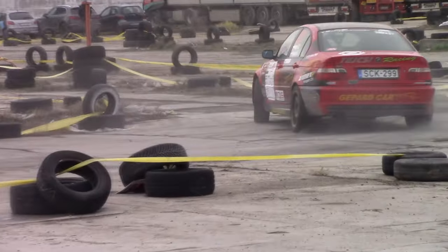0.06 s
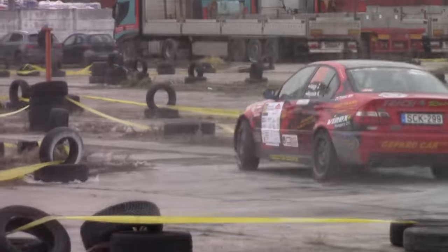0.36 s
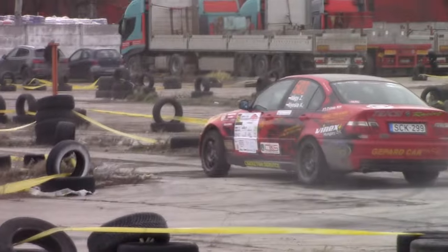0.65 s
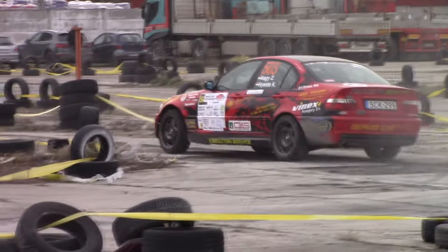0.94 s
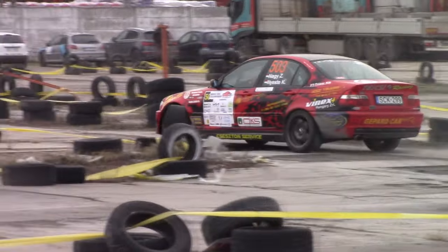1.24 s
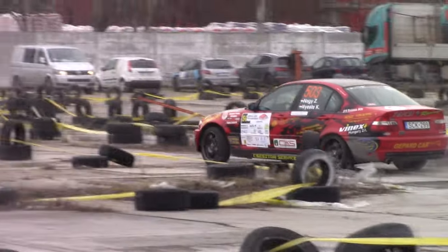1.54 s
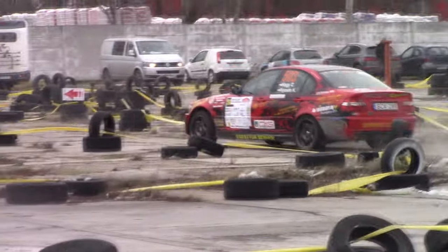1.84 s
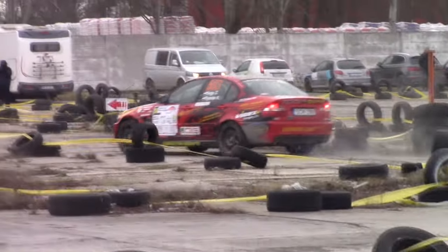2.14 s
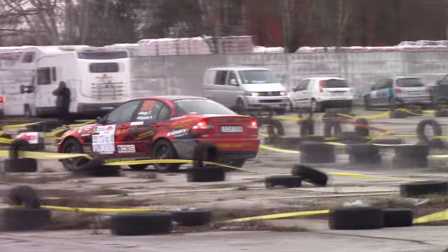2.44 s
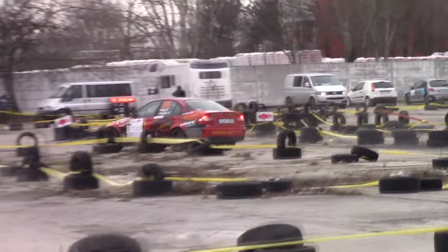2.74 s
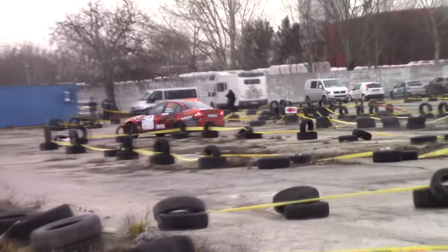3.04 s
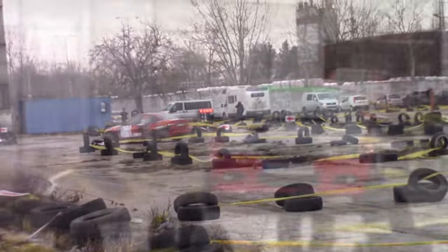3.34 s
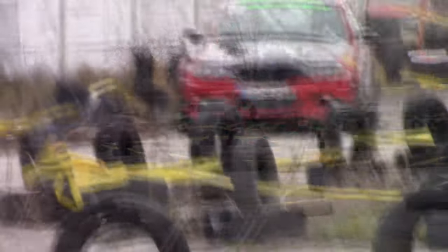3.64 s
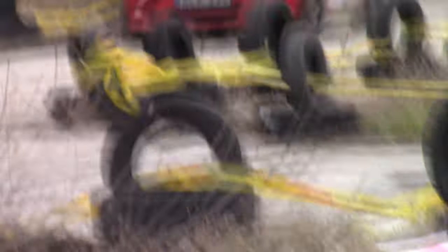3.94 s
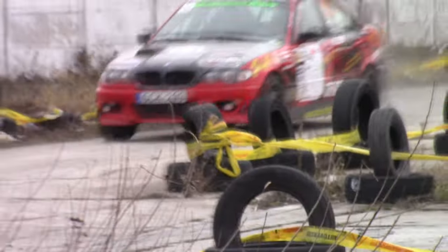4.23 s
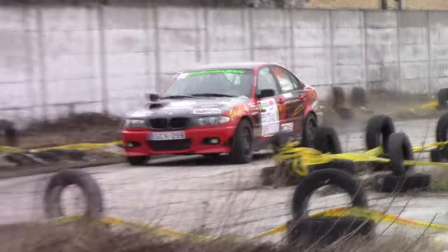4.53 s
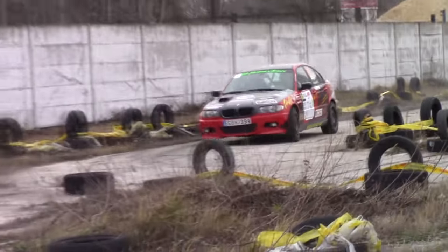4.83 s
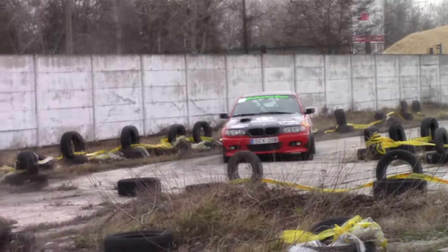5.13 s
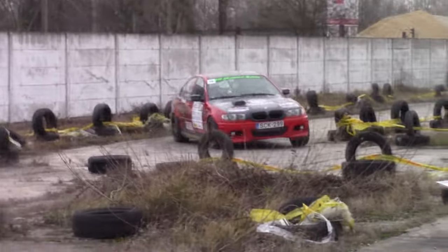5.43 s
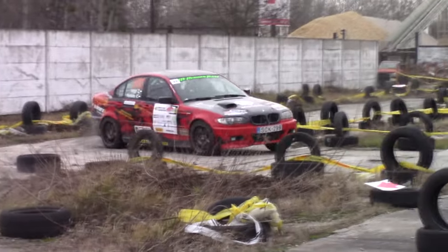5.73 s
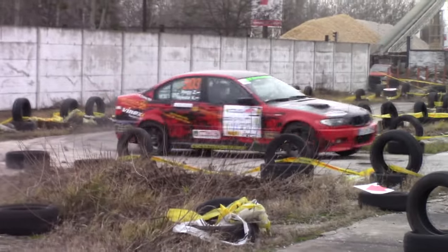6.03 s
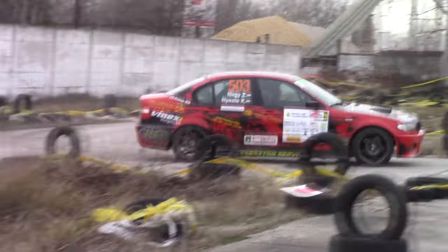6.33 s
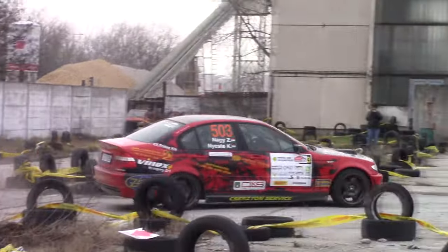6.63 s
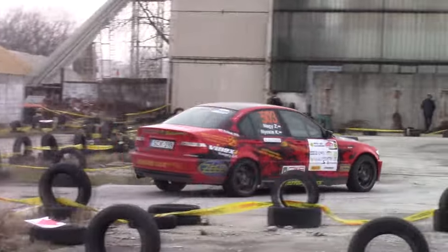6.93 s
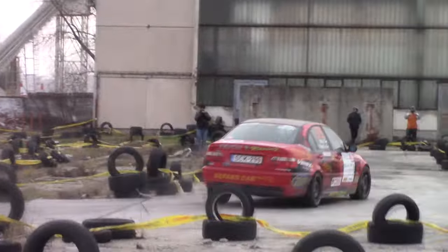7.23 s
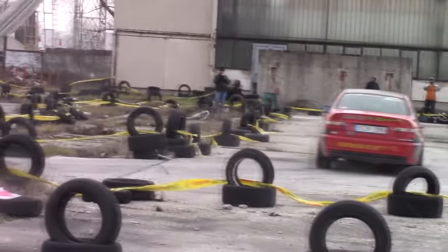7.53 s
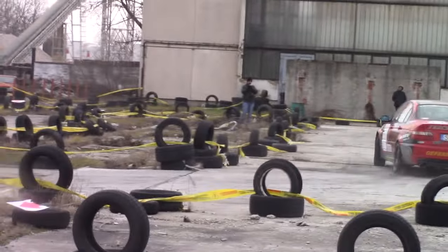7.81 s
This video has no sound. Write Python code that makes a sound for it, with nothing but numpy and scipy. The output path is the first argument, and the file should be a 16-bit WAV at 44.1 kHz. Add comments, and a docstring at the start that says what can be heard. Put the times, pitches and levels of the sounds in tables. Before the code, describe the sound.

Tyres squeal and chirp on concrete as a rally car accelerates in short, rising bursts nearby. The driver lifts off and the engine drops to an uneven burble with crackling backfires. Grit hisses and stones rattle under the wheels, followed by another cluster of pops. A long, wavering tyre howl fills the last part, with the engine revving up at the end. The outdoor lot adds only a faint echo.

```python
"""A concrete lot, heard from the edge of the course, where a six-cylinder rally car drifts through turns.
The exhaust fires one blast a cylinder: it rasps and booms on the throttle, and off it burbles and cracks
with unburnt fuel. The sliding tyres stick and slip into howls and chirps, scrape, and throw up grit.
A thin whine winds down between the turns, and walls round the lot return a faint echo."""
import sys
import numpy as np
from scipy import signal
from scipy.fft import rfft, irfft
from scipy.io import wavfile
from scipy.ndimage import uniform_filter1d

SR = 44100
rng = np.random.default_rng(int(sys.argv[2]) if len(sys.argv) > 2 else 0)


def master_out(mix):
    """Clip the mix to full scale and print it as 16-bit PCM to the path in sys.argv[1]."""
    frames = np.transpose(np.atleast_2d(mix))
    ceiling = np.clip(frames, -1, 1)
    pcm = np.round(ceiling * 32767).astype(np.int16)
    wavfile.write(sys.argv[1], SR, pcm)


N = 347067
TIME = np.arange(N) / SR


def undb(db):
    """Decibels to gain."""
    return 10 ** (np.asarray(db) / 20)


def curves(rows):
    """Automation lanes: each column after the time, drawn out to every sample."""
    times, *columns = np.transpose(rows)
    return [np.interp(TIME, times, column) for column in columns]


def gate(start, end, fade_s):
    """Opens between two times, with linear fades."""
    return np.clip(np.minimum(TIME - start, end - TIME) / fade_s + .5, 0, 1)


def swell(start, end, attack_s, release_s):
    """An envelope that rises towards one from the start and dies away after the end."""
    attack = 1 - np.exp(-np.maximum(TIME - start, 0) / attack_s)
    return attack * np.exp(-np.maximum(TIME - end, 0) / release_s)


def walk(rate):
    """A random modulator of spread 1 that glides to a new value `rate` times a second."""
    steps = rng.standard_normal(N // 10)
    wander = np.interp(TIME * rate, np.arange(len(steps)), steps)
    return wander / wander.std()


def colour(x, points, size=2048):
    """Minimum-phase EQ through points of f/Hz, level/dB."""
    hz, db = np.transpose(points)
    gain = undb(np.interp(np.log(np.fft.rfftfreq(size, 1 / SR) + 1), np.log(hz), db))
    cepstrum = irfft(np.log(gain))
    cepstrum[1:size // 2] *= 2
    cepstrum[size // 2 + 1:] = 0
    return signal.fftconvolve(x, irfft(np.exp(rfft(cepstrum))))[:len(x)]


def normalise(x, low_hz, high_hz):
    """Scales a sound to an RMS of one within a band."""
    hz = np.fft.rfftfreq(len(x), 1 / SR)
    band = rfft(x)[(hz > low_hz) & (hz < high_hz)]
    return x * len(x) / np.sqrt(2 * np.sum(abs(band) ** 2))


def walls(x, t60_s=0.3, predelay_s=0.002):
    """Scattered echoes from walls and parked cars, different at each ear."""
    t = np.arange(SR // 2) / SR
    echoes = rng.standard_normal((2, len(t))) ** 3 * undb(-60 * t / t60_s) * (t > predelay_s)
    echoes /= np.sqrt(np.sum(echoes ** 2, axis=1, keepdims=True))
    return signal.fftconvolve(x[None], echoes, axes=1)[:, :N]


def whine(wander=.011, flicker_db=4):
    """A thin, blurred, flickering tone that sinks in pitch, probably the turbo running down."""
    # the falling whine, one list a run: t/s, f/Hz, level/dB
    runs = [
        [(4.15, 14400, -62), (4.5, 10050, -53), (5, 7950, -52), (5.4, 7500, -55), (5.65, 7200, -50),
         (5.92, 6700, -51)],
        [(6.36, 9500, -56), (6.43, 9300, -47), (6.49, 8800, -42), (6.55, 8800, -45), (6.63, 8500, -58)],
    ]
    out = np.zeros(N)
    for run in runs:
        hz, db = curves(run)
        phase = 2 * np.pi * np.cumsum(hz * (1 + wander * walk(700))) / SR
        out += np.sin(phase) * undb(db + flicker_db * walk(35)) * gate(run[0][0], run[-1][0], .04)
    return out


def grit(eq, grain_db, flutter_db, flutter_rate):
    """Grainy noise: countless tiny impacts of unequal size, coming in flurries."""
    grains = undb(grain_db * walk(2500) + flutter_db * walk(flutter_rate))
    return colour(rng.standard_normal(N) * grains, eq)


def gravel(attack_s=0.021, release_s=0.037):
    """Coarse stones rattle under the tyres."""
    # the wheels cut through loose gravel: start/s, end/s, level/dB
    runs = [(1.92, 2.04, -32), (2.14, 2.24, -25.5), (3.522, 3.6, -22.5), (3.72, 4.013, -23.5),
            (4.176, 4.418, -37.5)]
    # colour of the stones: f/Hz, level/dB
    stone_eq = [(500, -38), (2000, -14), (3100, 4.5), (4400, -1), (6000, -10), (15000, -48)]
    stones = grit(stone_eq, grain_db=1.5, flutter_db=2.1, flutter_rate=70)
    level = sum(undb(db) * swell(start, end, attack_s, release_s) for start, end, db in runs)
    return normalise(stones, 3200, 4700) * level


def skid(roar_db=-14, hiss_db=-17, judder_db=0.7, attack_s=0.013, release_s=0.039):
    """Rubber rolls and scrubs over the concrete and flings hissing sprays of grit."""
    # how far off the car is, which sets the roar and hiss of rolling: t/s, distance/m
    distance = [(0, 19.6), (1.1, 16.6), (2.2, 22.5), (2.55, 33), (3.25, 40), (3.6, 14.7), (5.4, 17.7),
                (6.5, 12), (7.87, 13.6)]
    # the tyres scrub sideways: start/s, end/s, level/dB
    scrubs = [(0, 1.006, -30.5), (1.04, 1.17, -34.5), (1.29, 1.499, -27.5), (1.613, 2.11, -31),
              (2.118, 2.269, -27), (3.488, 3.61, -32), (3.692, 4.092, -28.5), (4.1, 4.413, -38),
              (5.072, 5.247, -27), (5.374, 5.919, -35), (5.933, 6.424, -31), (6.662, 6.76, -24.5),
              (6.793, 7.34, -30), (7.553, 7.87, -29)]
    # grit flung by the wheels: crest/s, rise/s, fade/s, level/dB
    sprays = [(.99, 0.026, 0.024, -32.5), (1.75, .06, 0.05, -34.5), (2.001, 0.12, 0.057, -25),
              (2.24, 0.049, 0.023, -33), (3.65, 0.066, 0.071, -17), (3.97, 0.17, 0.099, -23),
              (4.32, 0.15, 0.089, -30), (5.19, 0.052, 0.076, -33.5), (6.8, 0.058, .12, -37),
              (7.04, 0.07, 0.054, -31)]
    # colour of scrubbing rubber: f/Hz, level/dB
    scrape_eq = [(40, -52), (200, -47), (450, -21), (800, -7.5), (1300, 6), (2000, 5.5), (2700, 6.5),
                 (3600, 1), (4800, -10), (7000, -16), (15000, -75)]
    # colour of flying grit: f/Hz, level/dB
    spray_eq = [(500, -43.5), (2500, 1.5), (4800, -1.5), (6500, 4), (8500, -0.5), (10000, -7), (12000, -19),
                (15500, -30)]
    metres, = curves(distance)
    scrubbing = sum(undb(db) * swell(start, end, attack_s, release_s) for start, end, db in scrubs)
    scrape_level = np.hypot(undb(roar_db) / metres, scrubbing) * undb(-1.5 + judder_db * walk(20))
    flung_power = 0
    for crest, rise_s, fade_s, db in sprays:
        burst = np.exp(-np.maximum((crest - TIME) / rise_s, (TIME - crest) / fade_s))
        flung_power += (undb(db) * burst) ** 2
    spray_level = np.hypot(undb(hiss_db) / metres, np.sqrt(flung_power))
    scrape = grit(scrape_eq, grain_db=2.0, flutter_db=1.5, flutter_rate=90)
    spray = grit(spray_eq, grain_db=1.5, flutter_db=1.47, flutter_rate=58)
    return normalise(scrape, 3042, 3890) * scrape_level + normalise(spray, 6030, 12000) * spray_level


def chirps(wander=0.026, chatter_db=2.0, rasp=.3, third_db=-13, fade_s=.006):
    """For a moment the whole contact patch slips in step: a clear squeal with a rasping edge."""
    # squeals of the tread: t/s, length/s, first f/Hz, last f/Hz, level/dB, overtones/dB
    squeals = [(0.087, 0.044, 1990, 1790, -30, -25), (0.136, 0.032, 2420, 2186, -19.5, -36),
               (.175, 0.054, 2100, 2204, -24.5, -31), (0.228, 0.021, 1143, 966, -23, 0),
               (0.285, 0.012, 1340, 1300, -18, -24), (0.368, 0.022, 1350, 1284, -20, -21),
               (0.409, 0.0095, 1330, 1260, -18, -9), (0.459, 0.01, 1327, 1190, -19, -18),
               (0.48, 0.022, 1306, 1373, -25, -14), (.497, 0.018, 1362, 1120, -17, -23),
               (0.518, 0.048, 1088, 928, -29.5, -12), (0.951, 0.023, 1230, 1335, -18.5, -2.5),
               (0.975, 0.039, 1411, 1350, -20.5, -12), (1.08, 0.017, 1364, 1340, -21, -9),
               (1.37, 0.028, 1311, 1238, -21.5, -10), (5.104, 0.029, 1387, 1290, -22, -24),
               (5.145, 0.0317, 1333, 1200, -20.5, 1), (5.179, 0.027, 1228, 1216, -21, 7.5),
               (5.204, 0.053, 1226, 1240, -26.5, 10.5), (5.257, 0.023, 1240, 1230, -41, 20),
               (5.294, 0.017, 1230, 1223, -42, 19.5), (5.321, 0.12, 1335, 1302, -34.5, 4.5),
               (5.988, 0.042, 1900, 1858, -24, -24), (6.456, 0.041, 2652, 2548, -26, -27),
               (6.839, 0.042, 1850, 1890, -30, -24), (7.04, 0.044, 2390, 2480, -21, -20),
               (7.744, 0.0291, 2165, 2276, -22.5, -22)]
    out = np.zeros(N)
    waver = 1 + wander * walk(600)
    chatter = undb(chatter_db * walk(220)) * (1 + rasp * walk(800))
    for start, length, first_hz, last_hz, db, overtone_db in squeals:
        envelope = gate(start, start + length, fade_s)
        on = envelope > 0
        glide_hz = np.interp(TIME[on], [start, start + length], [first_hz, last_hz])
        phase = 2 * np.pi * np.cumsum(glide_hz * waver[on]) / SR
        overtones = np.sin(2 * phase) + undb(third_db) * np.sin(3 * phase)
        out[on] += undb(db) * envelope[on] * (np.sin(phase) + undb(overtone_db) * overtones)
    return out * chatter


def howl(hz, level, spread_hz, chatter_db, catch_db, wander=.033, low_cut_hz=650):
    """Tread blocks stick and slip out of step near one wavering pitch; the patch chatters and catches."""
    phase = 2 * np.pi * np.cumsum(hz * (1 + wander * walk(60))) / SR
    # slow noise in amplitude and phase smears the tone into a narrow band
    lowpass = signal.butter(2, spread_hz / 2, fs=SR, output="sos")
    blocks = signal.sosfilt(lowpass, rng.standard_normal((2, N)))
    blocks = (blocks[0] + 1j * blocks[1]) / blocks.std() / np.sqrt(2)
    grip = undb(chatter_db * walk(110) + catch_db * walk(22))
    tone = level * grip * np.real(blocks * np.exp(1j * phase))
    return signal.sosfilt(signal.butter(2, low_cut_hz, "high", fs=SR, output="sos"), tone)


def slides(high_ratio=1.85, fade_s=0.012):
    """In each slide the tread howls in two voices whose pitches bend together."""
    # tyre slides: start/s, end/s, first f/Hz, middle f/Hz, last f/Hz, low voice/dB, high voice/dB
    drifts = [(0, .2, 1102, 1088, 1190, -18, -13.5), (.25, .54, 1200, 1284, 1190, -21.5, -23.5),
              (.54, .93, 1080, 1159, 1210, -26, -36), (.93, 1.01, 1250, 1350, 1381, -21, -23),
              (1.64, 1.84, 1133, 1200, 1260, -18.5, -33), (3.36, 3.48, 1301, 1290, 1270, -26.5, -28.5),
              (3.49, 3.64, 1270, 1274, 1290, -25, -19.5), (5.08, 5.49, 1245, 1363, 1250, -28, -30),
              (5.49, 5.92, 1057, 995.6, 1040, -24.5, -22.5), (5.92, 6.28, 1009, 1032, 1150, -22, -19),
              (6.28, 6.66, 1090, 1130, 1070, -24, -30), (6.66, 6.97, 1071, 1029, 1040, -23, -19),
              (6.97, 7.31, 1134, 1249, 1110, -20.5, -19.5), (7.31, 7.54, 1024, 957.5, 1000, -21, -20),
              (7.54, 7.87, 1119, 1140, 1190, -17, -20.5)]
    hz, low_level, high_level = np.full(N, float(drifts[0][2])), 0, 0
    for start, end, first_hz, middle_hz, last_hz, low_db, high_db in drifts:
        progress = np.clip((TIME - start) / (end - start), 0, 1)
        arch = np.polyfit([0, .5, 1], [first_hz, middle_hz, last_hz], 2)
        hz = np.where(TIME >= start, np.polyval(arch, progress), hz)
        slip = swell(start, end, fade_s, fade_s)
        low_level += undb(low_db) * slip
        high_level += undb(high_db) * slip
    low = howl(hz, low_level, spread_hz=238, chatter_db=0.5, catch_db=2.45)
    high = howl(high_ratio * hz, high_level, spread_hz=360, chatter_db=2, catch_db=1.5)
    return undb(0.5) * low + undb(-1) * high


def cracks(ring_s=0.0014, ring_share=0.2, puff_s=0.015, puff_db=-24, snap_gain_db=19):
    """Unburnt fuel bangs in the exhaust: a sharp front with a very short ring and a puff of gas."""
    # backfires: t/s, bang peak/dB, ring f/Hz, snap before its gain/dB
    backfires = [(1.285, -0.5, 1805, -31.5), (2.505, -10, 1250, -51), (2.555, -12, 1400, -46),
                 (2.562, -9, 1500, -43), (2.564, -9, 1670, -45), (2.622, -20, 1500, -50),
                 (2.633, -15, 1270, -47), (2.651, -12, 1370, -41), (2.712, -19, 2130, -44),
                 (2.724, -13, 1017, -42), (2.743, -6, 695, -35), (2.818, -15, 1050, -47),
                 (2.836, -15, 1320, -47), (2.913, -15.5, 1120, -42), (2.953, -13, 1086, -39),
                 (3.022, -9, 1698, -36), (3.036, -12, 1310, -47), (3.058, -7, 1450, -50),
                 (3.065, -11, 1320, -45), (3.079, -8.5, 1400, -42), (3.106, -6, 1950, -44),
                 (3.121, -9.5, 1490, -45), (3.127, -9.5, 1380, -45), (3.142, -4, 1370, -28.5),
                 (4.501, -8.5, 2380, -41), (4.516, -3.5, 990, -46), (4.535, -5.5, 1030, -33),
                 (4.57, -5, 1090, -46), (4.575, -6, 1570, -39), (4.582, -7, 1120, -46),
                 (4.588, -5.5, 1470, -49), (4.629, -12, 947, -43), (4.766, -11, 1865, -35),
                 (4.854, -18, 1221, -43), (4.919, -9, 1780, -48)]
    # colour of the body of a bang: f/Hz, level/dB
    bang_eq = [(40, -38), (200, -24), (400, -19.5), (650, 0.5), (1300, 1.5), (2500, 3.5), (4000, -2.5),
               (6000, -18), (15000, -72)]
    # colour of its sharp front: f/Hz, level/dB
    snap_eq = [(1000, -31), (3500, 4.5), (6500, 15), (9000, -3.5), (15000, -44)]
    out, t = np.zeros(N), np.arange(SR // 20) / SR
    for start, db, hz, snap_db in backfires:
        puff = undb(puff_db) * rng.standard_normal(len(t)) * np.exp(-t / puff_s)
        front = 2 * (t == 0) + puff
        ring = ring_share * np.exp(-t / ring_s) * np.cos(2 * np.pi * hz * t)
        bang, snap = colour(front + ring, bang_eq), colour(front, snap_eq)
        at = int(start * SR)
        out[at:at + len(t)] += undb(db) * bang / abs(bang).max()
        out[at:at + len(t)] += undb(snap_db + snap_gain_db) * snap / abs(snap).max()
    return out


def driving(idle_hz=159.96, coast_s=1.8, coast_uneven=0.907, open_s=0.0042, shut_s=0.015):
    """Firing rate, unevenness and level of the engine as the throttle opens and shuts."""
    # pulls on the throttle: start/s, end/s, first firing rate/Hz, last firing rate/Hz,
    # easing/0-1, level/dB, unevenness/0-1
    pulls = [(0, .47, 162, 187, .3, -37.5, .35), (.6, .99, 133, 203, .35, -34.5, .15),
             (1.055, 1.215, 178, 208, 0, -32, .12), (1.28, 1.55, 181, 252, 0, -33.5, .17),
             (1.55, 2.02, 252, 346, .42, -32.5, .27), (6.64, 7.34, 171, 155, 0, -32, .7),
             (7.34, 7.87, 154, 223, 0, -35.5, .12)]
    # louder coughs in the burble: t/s, length/s, level/dB
    coughs = [(2.55, .025, -43), (2.62, 0.051, -40), (2.735, 0.02, -35), (2.81, 0.056, -39.5),
              (2.94, 0.12, -41.5), (3.115, 0.045, -41), (3.53, 0.033, -46), (3.71, 0.16, -35),
              (4.249, 0.065, -38.5), (4.51, 0.076, -32.5), (4.63, 0.03, -39), (4.82, 0.071, -38),
              (5.119, 0.033, -33), (5.47, 0.021, -36), (5.59, 0.091, -36), (5.77, 0.039, -51),
              (5.93, 0.046, -35.5), (6.11, .06, -31), (6.2, .19, -41), (6.45, 0.054, -33),
              (6.65, 0.11, -31)]
    hz, uneven = np.full(N, idle_hz), np.full(N, coast_uneven)
    power = undb(-45.5 + 1.5 * walk(16)) ** 2  # the wavering bed of burble
    for start, end, first_hz, last_hz, ease, db, pull_uneven in pulls:
        progress = np.clip((TIME - start) / (end - start), 0, 1)
        pull_hz = first_hz + (last_hz - first_hz) * (progress + ease * progress * (1 - progress))
        # off the throttle the revs settle towards a fast idle
        coast = np.exp(-np.maximum(TIME - end, 0) / coast_s)
        hz = np.where(TIME >= start, idle_hz + (pull_hz - idle_hz) * coast, hz)
        throttle = swell(start, end, open_s, shut_s)
        uneven += throttle * (pull_uneven - uneven)
        power += (undb(db) * throttle) ** 2
    for start, length, db in coughs:
        power += (undb(db) * swell(start, start + length, open_s, shut_s)) ** 2
    return hz, np.clip(uneven, 0, 1), np.sqrt(power)


def boom(hz, uneven, waver_db=3, odd_db=5, even_db=-4):
    """Under load the two banks alternate: multiples of half the firing rate sweep the pipe's resonance."""
    # resonance of the pipe under load: f/Hz, level/dB
    resonance = [(150, -36), (330, -36), (460, -18), (580, -14), (690, -1), (780, -6), (1000, -18)]
    pipe_hz, pipe_db = np.transpose(resonance)
    phase = np.pi * np.cumsum(hz) / SR
    note = 0
    for k in range(2, 9):
        db = np.interp(k * hz / 2, pipe_hz, pipe_db) + (odd_db if k % 2 else even_db)
        note += undb(db + waver_db * walk(45)) * np.sin(k * phase + k * k)
    return note * (1 - uneven) ** 2


def exhaust(hz, uneven, scatter_db=2, misfire_db=1.5, jitter_s=.00016, stumble_s=0.001197):
    """One blast a firing; off the throttle they come unevenly and the note breaks into a burble."""
    # strength of each cylinder in firing order: level/dB
    cylinders_db = [3, -8, -1, -2, 0, -9]
    # colour of a blast from the tailpipe: f/Hz, level/dB
    pipe_eq = [(40, -56), (120, -67), (180, -32.5), (300, -29), (450, -13), (680, 2.5), (900, 3.5),
               (1250, 7), (1700, 2.5), (2500, -1), (3600, -15), (5000, -38), (8000, -34), (15000, -69)]
    header_s, gas_db, gas_cycles, thud_hz, thud_db = .0006, -13, .5, 320, 2
    cycles = np.cumsum(hz) / SR
    firings = np.flatnonzero(np.diff(np.floor(cycles)))
    size_luck, time_luck = rng.standard_normal((N // 100, 2))[:len(firings)].T
    # the cylinders' own pattern stands out under load
    pattern_db = np.resize(cylinders_db, len(firings)) * (1 - uneven[firings] ** 2)
    size = undb(pattern_db + (scatter_db + misfire_db * uneven[firings]) * np.clip(size_luck, -2, 2))
    size /= np.sqrt(uniform_filter1d(size ** 2, size=12) * hz[firings])  # even power at any revs
    # every other blast takes the longer header pipe
    late_s = header_s * (np.arange(len(firings)) % 2)
    late_s += (jitter_s + stumble_s * uneven[firings] ** 2) * time_luck
    blasts = np.bincount(np.clip(firings + SR * late_s, 0, N - 1).astype(int), size, N)
    # turbulent gas follows each blast out of the pipe
    gas = rng.standard_normal(N) * np.exp(-(cycles % 1) / gas_cycles)
    flow = blasts / blasts.std() + undb(gas_db) * (1 + 2 * uneven) * gas / gas.std()
    # late burning thuds in the silencer
    thud = undb(thud_db) * uneven * signal.lfilter(*signal.iirpeak(thud_hz, 2, fs=SR), flow)
    return normalise(colour(flow + thud, pipe_eq), 400, 783)


def scene():
    """Engine and tyres dead centre, with the faint stereo echo of the lot."""
    hz, uneven, level = driving()
    engine = level * (undb(-1) * exhaust(hz, uneven) + boom(hz, uneven)) + undb(0.5) * cracks() + whine()
    car = engine + slides() + undb(5) * chirps() + skid() + gravel()
    return car + undb(-26) * walls(car)


def record(dry, ceiling=1.12, lopsided=0.0098, top_hz=15700):
    """Two microphone ports on a camera that soft-clips the peaks, a little lopsidedly, and cuts the top."""
    # sound scattered near the microphones, opposite in the two: f/Hz, level/dB
    width_eq = [(100, -15), (500, -25), (1000, -24), (2300, -18), (4500, -10), (8000, -7), (10000, -6),
                (12500, 0)]
    # treble difference between the ports: f/Hz, left minus right/dB
    port_eq = [(2500, 0), (4000, -1), (8000, -3.2), (12000, 2)]
    scatter = rng.standard_normal(SR // 10) * np.linspace(1, 0, SR // 10) ** 2
    scatter /= np.linalg.norm(scatter)
    side = colour(signal.fftconvolve(dry.mean(axis=0), scatter)[:N], width_eq)
    left = colour(dry[0] + side, [(hz, db / 2) for hz, db in port_eq])
    right = colour(dry[1] - side, [(hz, -db / 2) for hz, db in port_eq])
    rounded = ceiling * np.tanh(np.array([left, right]) / ceiling)
    wet = rounded + lopsided * rounded ** 4
    wet = signal.sosfilt(signal.butter(2, 20, "high", fs=SR, output="sos"), wet)
    return signal.sosfilt(signal.ellip(10, .2, 80, top_hz, fs=SR, output="sos"), wet)


dry = scene()
out = record(dry)
master_out(out)
```